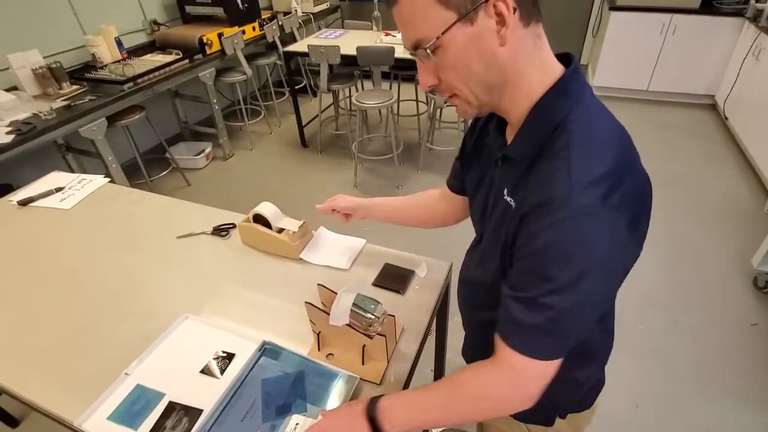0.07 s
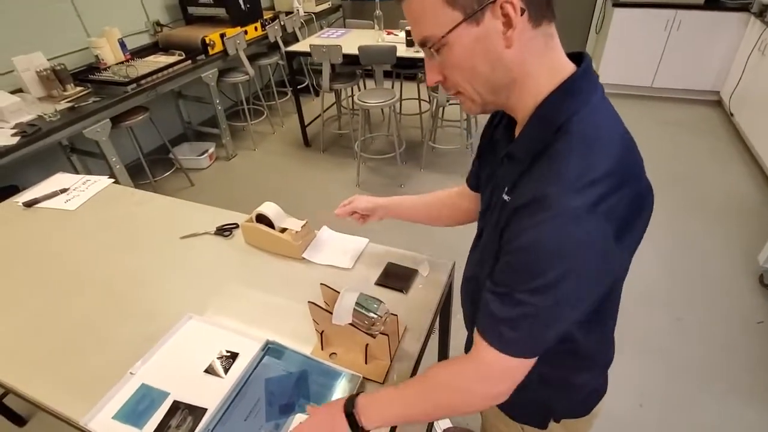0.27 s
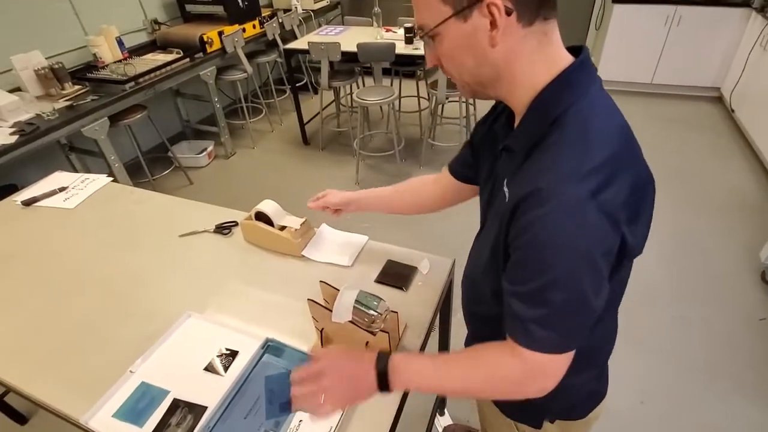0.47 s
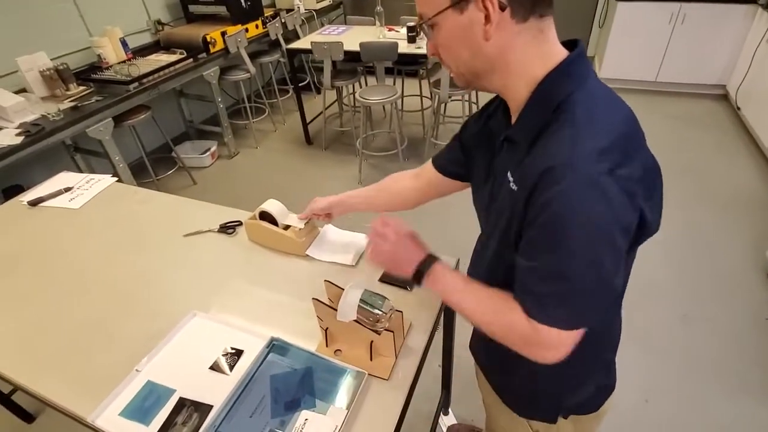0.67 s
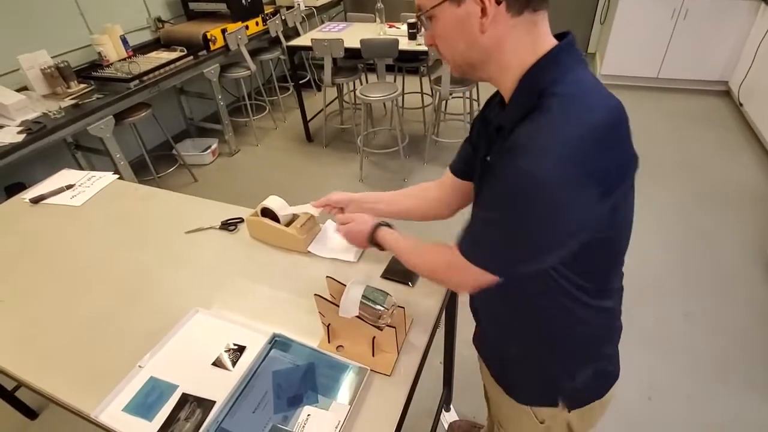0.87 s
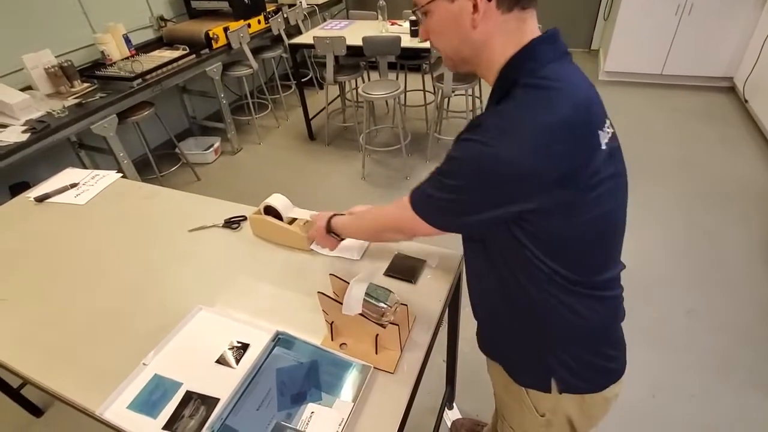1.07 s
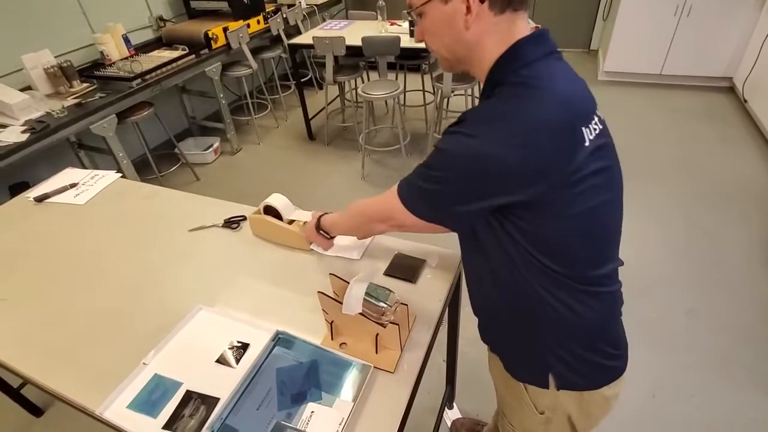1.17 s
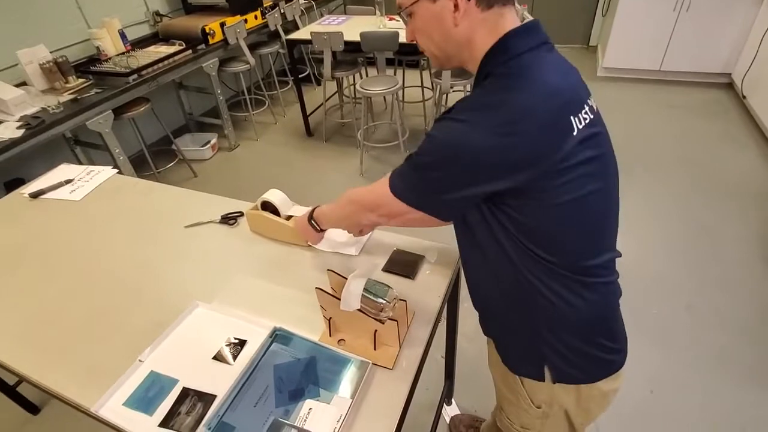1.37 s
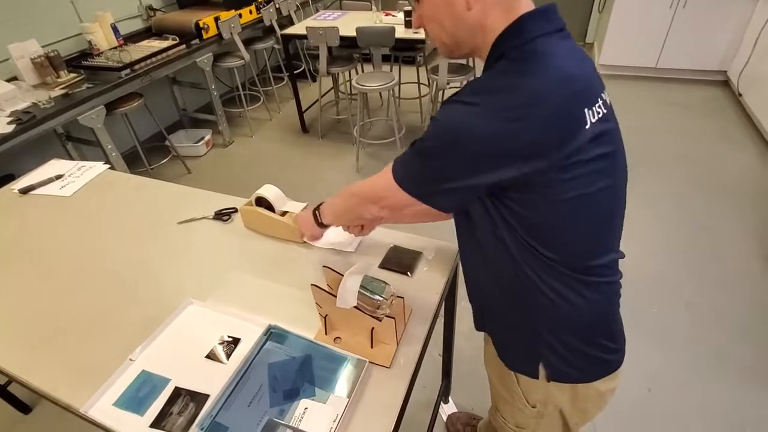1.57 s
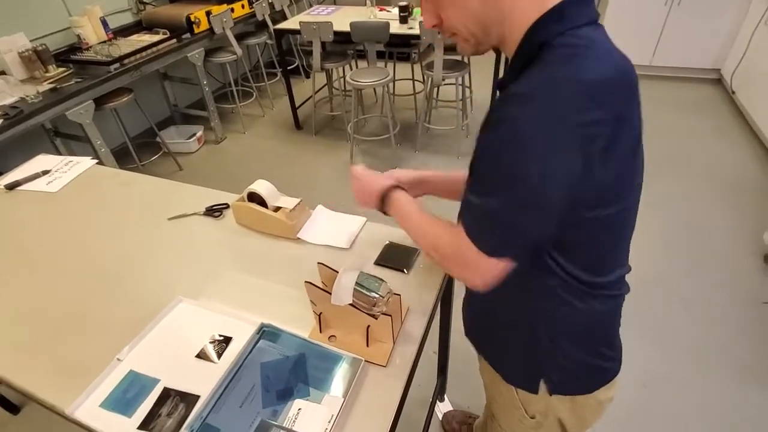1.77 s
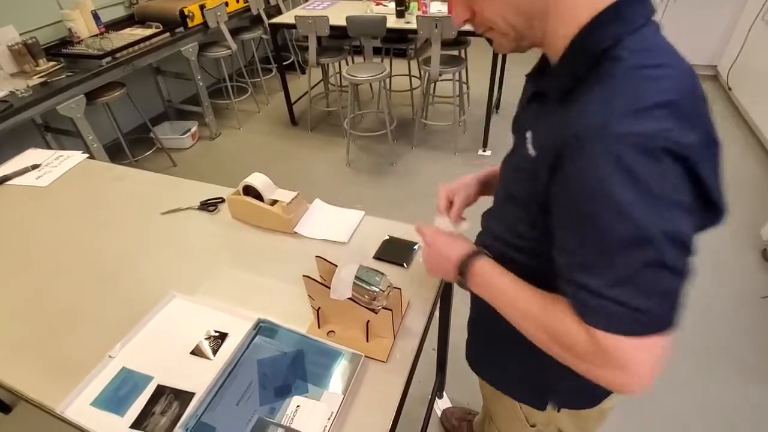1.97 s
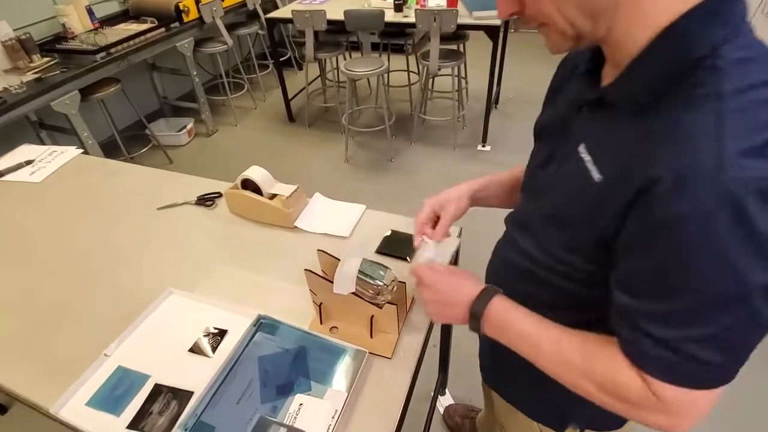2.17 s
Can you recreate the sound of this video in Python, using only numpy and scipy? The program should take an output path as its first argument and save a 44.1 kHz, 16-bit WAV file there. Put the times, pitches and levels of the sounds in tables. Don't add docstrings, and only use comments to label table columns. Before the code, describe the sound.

Tape groans and rips off its roll, cracks against the blade, then crackles in the fingers

```python
import sys
import numpy as np
from scipy import signal
from scipy.fft import rfft, irfft
from scipy.io import wavfile
from scipy.ndimage import uniform_filter1d

SR = 44100
rng = np.random.default_rng(int(sys.argv[2]) if len(sys.argv) > 2 else 0)


def linear_from_db(decibels):
    return 10 ** (np.asarray(decibels, float) / 20)


def to_wav(s):
    ch = np.atleast_2d(s).T
    pcm = np.round(np.clip(ch, -1, 1) * 32767)
    wavfile.write(sys.argv[1], SR, pcm.astype(np.int16))


N = 97637
T = np.arange(N) / SR
F = np.maximum(np.fft.rfftfreq(N, 1 / SR), 1)
LEFT_RIGHT = np.array([[1], [-1]])

# [f/Hz, level/dB per Hz]
RUMBLE_TONE = [(15, -54), (25, -21), (39, -14), (64, -5.5), (87, -3.5), (124, -6), (189, -18), (308, -23.5),
               (1200, -63.5), (1560, -112), (2640, -120)]
# [f/Hz, level/dB per Hz]
AIR_HISS_TONE = [(1000, -17.5), (1640, -0.5), (2560, -14), (4300, -18), (5500, -10), (8100, -10.5),
                 (9300, -25), (16000, -18)]
# [f/Hz, width/Hz, level/dB]
HUM = [(57.3, 9, -56.5), (119.44, 5.3, -60.5), (294.5, 24.6, -72.5)]
# [f/Hz, level/dB]
MAINS = [(59, -51.5), (120, -56.5)]
# [t/s, level/dB]
RUSTLE = [(0, -57.5), (.18, -63), (.28, -78), (1.2, -94), (1.4, -62.5), (1.47, -59), (1.485, -73),
          (1.6, -53), (1.64, -64.5), (1.7, -62.5), (1.8, -63), (1.91, -62.5), (1.95, -54), (1.992, -64),
          (2.03, -48), (2.075, -52), (2.125, -70), (2.21, -64)]
# [f/Hz, level/dB]
SLEEVE_TONE = [(400, -5), (1190, -16.5), (1570, -7.5), (2400, -17.5), (3400, -6.5), (4300, -16),
               (5600, -9.5), (7000, -31.5)]
# [f/Hz, level/dB]
FINGER_TONE = [(400, 1), (520, 5), (1100, -12), (1800, -0.5), (5500, 2), (9000, -5), (16000, -7)]
# [t/s, level/dB, f/Hz, time to fade by 60 dB/s]
THUDS = [(1.512, -43.5, 251, 0.069), (1.519, -38.5, 89, 0.13), (1.828, -46.5, 341, 0.043),
         (2.163, -41, 275, 0.039)]
# [t/s, peak level/dB, dull part level/dB, length/s, centre f/Hz]
TOUCHES = [(0.6618, -43, -8.5, 0.0027, 2000), (0.743, -34, -25, 0.0034, 9500),
           (0.756, -29, -17, 0.004, 9300), (0.764, -37, -9, .003, 2000), (0.768, -29, -32, 0.002, 9500),
           (0.783, -14, -21.5, 0.002, 9100), (0.796, -13, -26, 0.002, 9100),
           (0.8082, -10.5, -19, 0.003, 8900), (1.291, -55.5, -2, 0.0078, 3000),
           (1.356, -49.5, -4.5, 0.0026, 3000), (1.4, -32, -14, 0.002, 2100), (1.465, -47, -1, 0.0027, 900),
           (1.477, -34.5, -29, 0.008, 2300), (1.651, -44, -10.5, 0.0022, 3200),
           (1.6564, -34, -7, 0.0019, 3600), (1.674, -32, -15, 0.002, 10100),
           (1.714, -36, -20, 0.00086, 6900), (1.773, -29, -26, .0015, 5500),
           (1.828, -41.5, -9, 0.00065, 1700), (1.922, -30, -27, 0.0017, 7400),
           (1.929, -24.5, -26, 0.00095, 4600), (1.949, -41, -13.5, 0.0038, 2000),
           (1.9965, -26, -22.5, 0.00086, 4480), (2.005, -22.5, -27, 0.0017, 10200),
           (2.0072, -30, -22, 0.0018, 4500), (2.012, -29, -20.5, 0.0043, 3640),
           (2.017, -34.5, -23, 0.0033, 3500), (2.022, -25.5, -21.5, 0.0017, 5500),
           (2.098, -38.5, -27, 0.0031, 4870), (2.1218, -33, -29, 0.00085, 3800),
           (2.122, -32, -33, 0.00091, 10000), (2.136, -36, -35, 0.0022, 5000),
           (2.14, -31, -35, 0.0011, 9000), (2.1448, -22, -24, 0.0014, 7500),
           (2.152, -18.5, -31, 0.0031, 9400), (2.156, -25, -26, 0.0036, 6040),
           (2.16, -22.5, -25.5, 0.0016, 8950), (2.1638, -15, -23.5, 0.0014, 6360),
           (2.168, -33, -19, .002, 1800)]
# [f/Hz, level/dB]
CRACKLE_TONE = [(900, -30), (1500, -33), (2800, -0.5), (5900, 0), (9000, -6.5), (12300, 1), (16000, -3)]
# [f/Hz, level/dB, time to fade by 60 dB/s]
BLADE = [(903, -19, 0.027), (1604, -2.5, 0.038), (1936, -4, 0.035), (2480, -18, 0.025), (3304, -4, 0.02),
         (4940, 2, 0.031), (6490, 2.5, 0.025), (9270, 4, 0.017), (11460, -3.5, 0.017), (14100, 2, 0.012)]
# [f/Hz, level/dB]
SNAP_TONE = [(150, -12), (500, -5), (1250, -3), (1800, -2), (5500, 2.5), (7800, -7.5), (9500, -3.5),
             (16000, -9.5)]
# [t/s, f/Hz, level/dB]
DRUM = [(.655, 300, -55), (.672, 285, -39.5), (.705, 289.4, -41), (.725, 285, -47), (.742, 347, -38),
        (.757, 332, -36), (.772, 338, -45), (.79, 325, -41), (.81, 310, -60)]
# [t/s, slip rate f/Hz, level/dB]
GROAN = [(.652, 133.3, -38.5), (.67, 136.8, -34), (.698, 155.8, -30.5), (.718, 167.6, -29.5),
         (.738, 194, -33), (.747, 203, -40), (.758, 208, -33), (.772, 205.4, -47), (.83, 207, -46)]
# [f/Hz, width/Hz, level/dB]
BODY = [(159, 105, 1), (306, 115, -5), (446, 47, -18), (646, 470, -27), (1500, 80, -23)]
# [t/s, level/dB]
CREEP = [(.638, -83), (.66, -59.5), (.69, -56), (.73, -49.5), (.755, -53.5), (.775, -53.5), (.79, -39.5)]
# [t/s, level/dB]
PULL = [(.774, -41), (.779, -29.5), (.803, -28), (.809, -24), (.95, -26), (1.04, -27.5), (1.079, -31),
        (1.084, -53), (1.125, -59)]
# [f/Hz, level/dB per Hz]
CREEP_TONE = [(400, -17), (700, -4.5), (1170, -27), (1500, -9.5), (3500, -9.5), (6500, -16), (8500, -24),
              (15500, -31)]
# [f/Hz, width/Hz, level/dB]
CREEP_BANDS = [(1460, 540, 7.9), (3450, 290, 7.7), (5500, 370, 8.8), (6400, 280, 11.2), (11000, 1700, 3)]
# [f/Hz, level/dB per Hz]
PEEL_TONE = [(150, -10), (300, -14), (900, -10.5), (1400, -10), (3500, -0.5), (9000, -4.5), (13500, -2.5),
             (16000, -6)]
# [f/Hz, width/Hz, level/dB]
STRIP = [(920, 260, -4), (1660, 350, -4.5), (3170, 580, -21), (5100, 660, -28), (6340, 840, -4),
         (8740, 550, -1), (13770, 2400, 1.5)]
# [f/Hz, time to fade by 60 dB/s]
ROOM_T60 = [(200, 0.58), (1000, 0.45), (3000, 0.41), (7000, 0.31), (15000, 0.18)]
# [f/Hz, left minus right level/dB]
PORTS = [(300, 0), (700, 0), (1290, 5.5), (2380, 1), (4400, -8), (8120, -0.5), (15000, 8)]


def curve(table, col=1):
    a = np.array(table)
    return np.interp(T, a[:, 0], a[:, col])


def over_hz(table):
    a = np.array(table)
    return np.interp(np.log(F), np.log(np.maximum(a[:, 0], 1)), a[:, 1])


def unit(x):
    return x / np.sqrt(np.mean(x ** 2))


def peak(hz, width_hz):
    return 1j * F * width_hz / (hz ** 2 - F ** 2 + 1j * F * width_hz)


def filt(x, response):
    return irfft(rfft(x) * response, N)


def flutter(rate, depth_db):
    k = int(SR / rate)
    steps = np.repeat(rng.standard_normal(N // k + 1), k)[:N]
    return linear_from_db(depth_db * uniform_filter1d(steps, k))


def burst(at, fall, rise=0.00018):
    d = T - at
    return np.exp(np.where(d < 0, d / rise, -d / fall))


def grains(spread_db, tone, peaks=()):
    size = np.minimum(rng.exponential(size=N), 3.09)
    snaps = rng.standard_normal(N) * linear_from_db(spread_db * size)
    resonance = 1 + sum(linear_from_db(db) * peak(f, w) for f, w, db in peaks)
    return unit(filt(snaps, linear_from_db(over_hz(tone)) * resonance))


def spread():
    mid, side = rfft(rng.standard_normal((2, N)))
    width = np.maximum(F / np.hypot(F, 1320), 0.15)
    return mid + side * width * LEFT_RIGHT


def ventilation():
    rumble = unit(irfft(spread() * linear_from_db(over_hz(RUMBLE_TONE)) * (F < 1200), N))
    hiss = unit(irfft(spread() * linear_from_db(over_hz(AIR_HISS_TONE)) * (F > 1000), N))
    out = linear_from_db(-51.5) * rumble + linear_from_db(-71) * hiss
    for f, db in MAINS:
        out = out + linear_from_db(db + 1.5) * flutter(5, 2.5) * np.sin(2 * np.pi * f * T)
    for f, w, db in HUM:
        out = out + linear_from_db(db) * unit(irfft(spread() * peak(f, w) ** 2, N))
    return out


def rustle():
    early = T < .5
    sleeve = grains(1.5, SLEEVE_TONE)
    fingers = flutter(24.93, 5.2) * grains(4.3, FINGER_TONE)
    return linear_from_db(curve(RUSTLE)) * (early * sleeve + ~early * fingers)


def thuds():
    out = 0
    for s, db, hz, t60 in THUDS:
        since = np.maximum(T - s, 0)
        out = out + linear_from_db(db - 60 * since / t60) * np.sin(2 * np.pi * hz * since)
    return out


def touches():
    click_db, crackle_db, dull_db = 4.5, -7, 4.5
    focus_db, focus_width = 6, 0.34
    pad = peak(675, 630) - 0.76 * peak(422, 166) + 0.59 * peak(1410, 1230)
    tap = unit(filt(rng.standard_normal(N), pad))
    crackle = grains(5.5, CRACKLE_TONE)
    tone = linear_from_db(over_hz(CRACKLE_TONE))
    bright, dull = 0, 0
    for s, db, dull_part_db, length, hz in TOUCHES:
        click = linear_from_db(click_db) * tone * np.exp(-2j * np.pi * F * (s + 0.000377))
        focus = linear_from_db(db - focus_db / 2) * (1 + linear_from_db(focus_db) * peak(hz, focus_width * hz))
        bright = bright + focus * (click + linear_from_db(crackle_db) * rfft(burst(s, length) * crackle))
        dull = dull + linear_from_db(db + dull_part_db + dull_db) * burst(s, 2.21 * length)
    return irfft(bright, N) + dull * tap


def snap():
    at, rise, fall = 1.4958, .0008, 0.0038
    level_db, ring_db = -18, 0.5
    echo_s, echo_db = 0.0092, -8
    shape = burst(at, fall, rise) + linear_from_db(echo_db) * burst(at + echo_s, fall, rise)
    crack = grains(1.0, SNAP_TONE) * shape
    d = np.maximum(T - at + 2 * rise, 0)
    ring = sum(linear_from_db(db - 60 * d / t60) * np.sin(2 * np.pi * f * d) for f, db, t60 in BLADE)
    ring = ring * (1 - np.exp(-(d / rise) ** 2))
    return linear_from_db(level_db) * crack, linear_from_db(level_db + ring_db) * 2 * ring / np.abs(ring).max()


def drum():
    on = (T > DRUM[0][0]) * (T < DRUM[-1][0]) * linear_from_db(curve(DRUM, col=2) + 3.5)
    phase = 2 * np.pi * np.cumsum(curve(DRUM) * flutter(90, 0.19)) / SR
    return on * flutter(50, 1.0) * (np.sin(phase) + 0.23 * np.sin(phase * 1.3))


def groan():
    jitter_db, scatter_db = 8.57 * 0.05, 2.5
    live = (T > GROAN[0][0]) & (T < GROAN[-1][0])
    phase = np.cumsum(curve(GROAN) * flutter(150, jitter_db) * live) / SR
    slips = np.diff(np.floor(phase), prepend=0) * flutter(170, scatter_db)
    body = sum((-1) ** k * linear_from_db(db) * peak(f, w) for k, (f, w, db) in enumerate(BODY))
    body = body / (1 + 1j * F / 1800) ** 2
    scale = 1 / np.std(filt(slips, body)[live])
    return filt(slips * linear_from_db(curve(GROAN, col=2)), body) * scale, phase % 1


def peel(phase):
    creep_on = (T > CREEP[0][0]) * (T < CREEP[-1][0])
    puffs = .5 + 2.73 * np.exp(-phase / 0.99)
    creep = grains(2.7, CREEP_TONE, CREEP_BANDS) * linear_from_db(curve(CREEP)) * puffs * flutter(59.2, 1.9)
    catch_s, catch_fall_s, again_s = 1.0995, 0.006, 0.0117
    catch = burst(catch_s, catch_fall_s, 0.00063)
    catch = catch + linear_from_db(-6) * burst(catch_s + again_s, catch_fall_s / 2, 0.0009)
    effort = linear_from_db(curve(PULL)) * (T > PULL[0][0]) * (T < PULL[-1][0]) + linear_from_db(-26.5) * catch
    near, edge, roll = (grains(6.4, PEEL_TONE, STRIP) * effort * flutter(500, 1.4) for _ in range(3))
    return creep * creep_on + near, linear_from_db(-2) * edge, linear_from_db(-4.5) * roll


def room(x):
    early_db, early_t60_s, gap_s = 9, 0.029, 0.00236
    noise, tail = spread(), 0
    a = np.array(ROOM_T60)
    for hz in 60 * 2. ** np.arange(9):
        share = np.maximum(1 - np.abs(np.log2(F / hz)), 0)
        t60 = np.interp(np.log(hz), np.log(a[:, 0]), a[:, 1])
        tail = tail + irfft(noise * share, N) * linear_from_db(-60 * T / t60)
    tail = tail * (1 + linear_from_db(early_db - 60 * T / early_t60_s)) * (T > gap_s) * (T < 1.2)
    tail = tail / np.sqrt(np.sum(tail ** 2) / 2)
    return signal.fftconvolve(x[None], tail, axes=1)[:, :N] * linear_from_db(-4)


def ports(x, lead_s, pan_db):
    side = LEFT_RIGHT / 2
    colour = linear_from_db((over_hz(PORTS) + pan_db) * side)
    return filt(x, colour * np.exp(2j * np.pi * F * lead_s * side))


def scene():
    low, phase = groan()
    hiss, edge, roll = peel(phase)
    hands = touches()
    crack, ring = snap()
    src = low + drum() + hiss + hands + crack + thuds() + rustle()
    src = filt(src, 1 - 0.65 * peak(1125, 380))
    moved = T > 1.9
    direct = ports(src * ~moved + ring, lead_s=.00012, pan_db=0)
    direct = direct + ports(src * moved + edge, lead_s=-0.000018, pan_db=-3)
    direct = direct + ports(roll, lead_s=0.000308, pan_db=1.5)
    wet = room(src + edge + roll + (linear_from_db(3) - 1) * crack)
    return direct + wet + ventilation() * linear_from_db(1.2 * LEFT_RIGHT / 2)


def top_cut(x):
    return signal.sosfilt(signal.butter(12, 16870, fs=SR, output="sos"), x)


def record(dry):
    low_pass = signal.ellip(8, .2, 30, 15800, fs=SR, output="sos")
    mix = signal.sosfiltfilt(low_pass, dry)
    return top_cut(mix)


dry = scene()
out = record(dry)
to_wav(out)
```